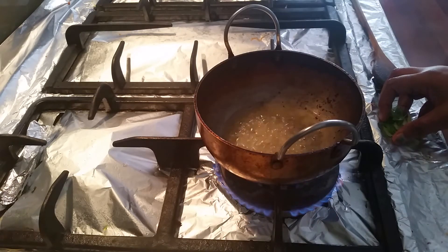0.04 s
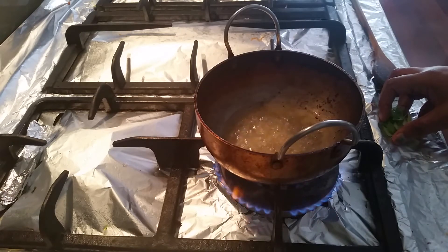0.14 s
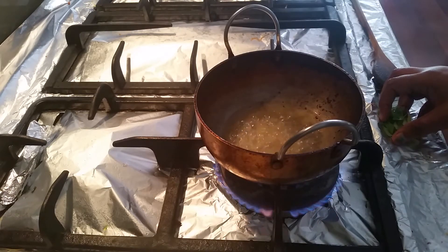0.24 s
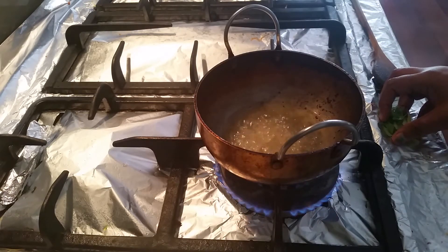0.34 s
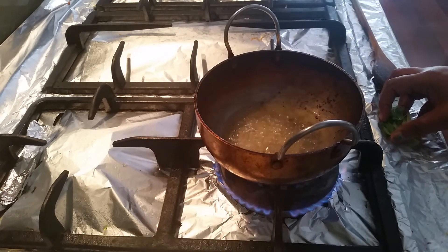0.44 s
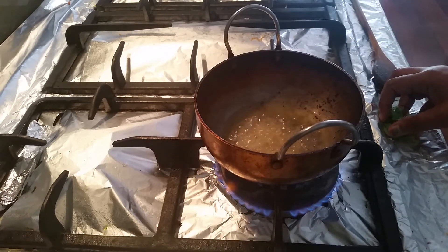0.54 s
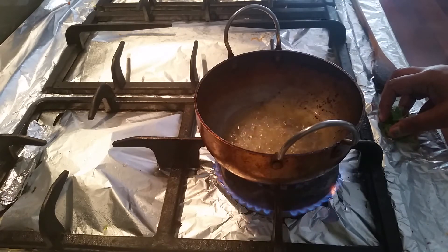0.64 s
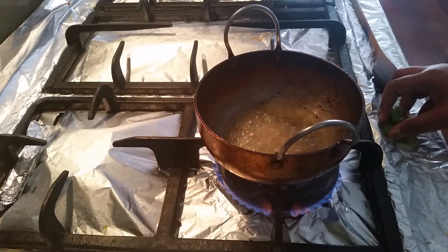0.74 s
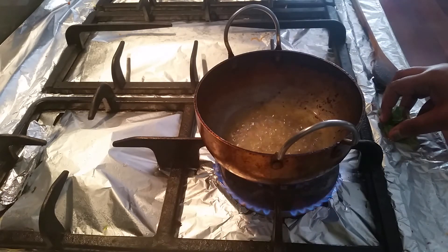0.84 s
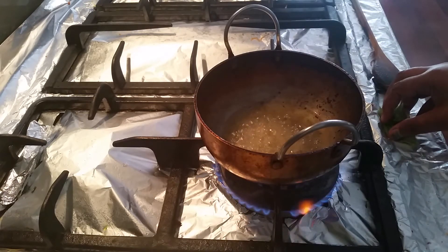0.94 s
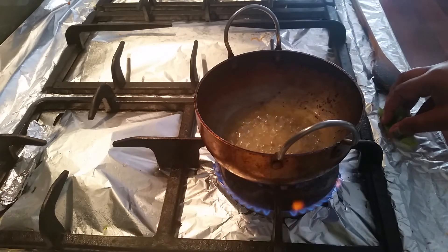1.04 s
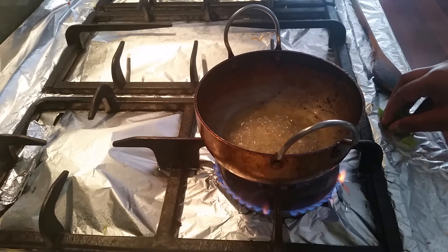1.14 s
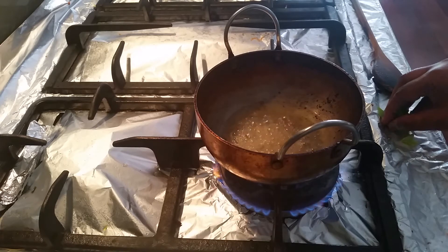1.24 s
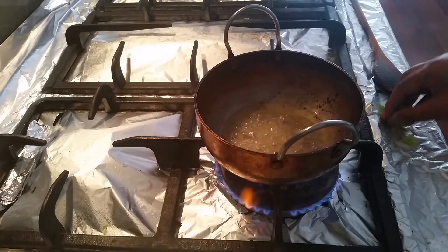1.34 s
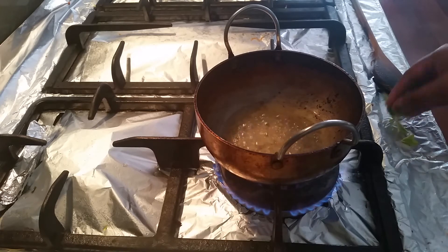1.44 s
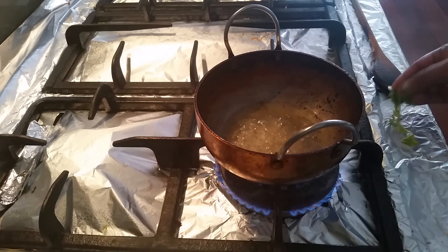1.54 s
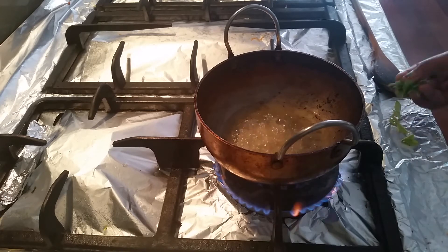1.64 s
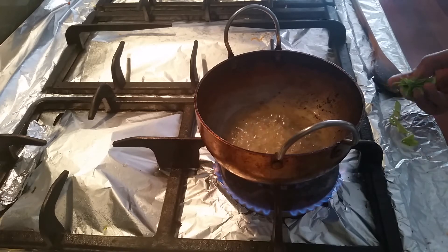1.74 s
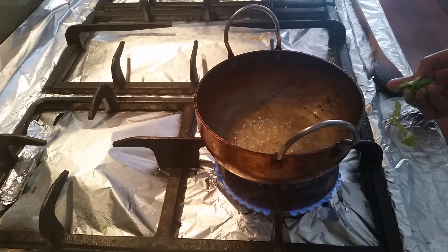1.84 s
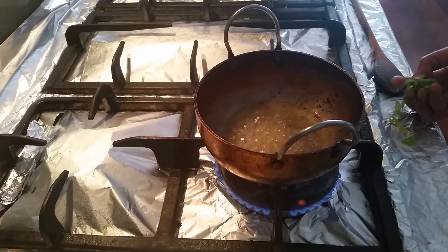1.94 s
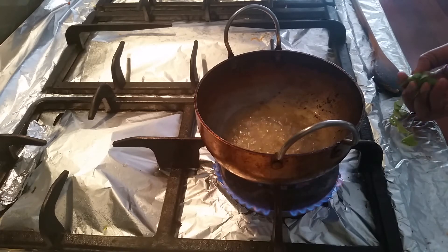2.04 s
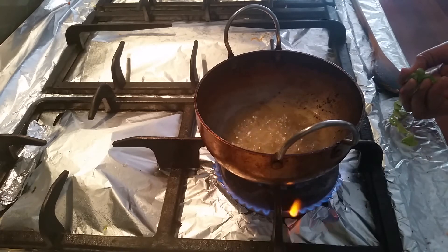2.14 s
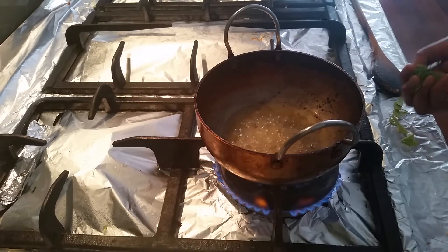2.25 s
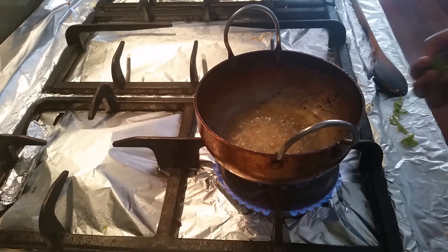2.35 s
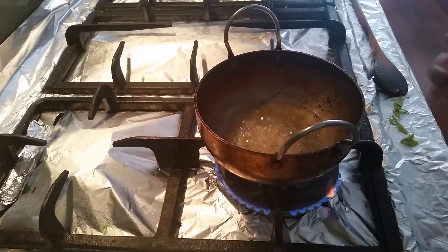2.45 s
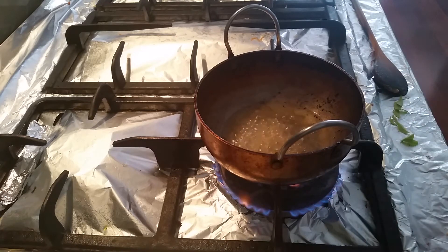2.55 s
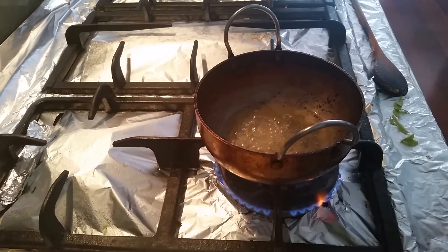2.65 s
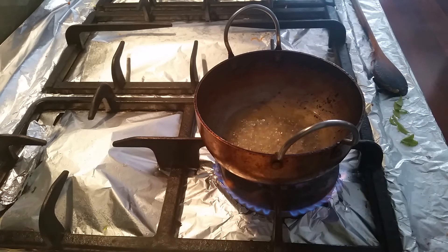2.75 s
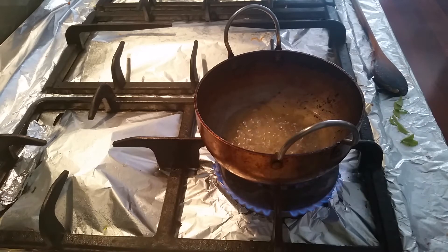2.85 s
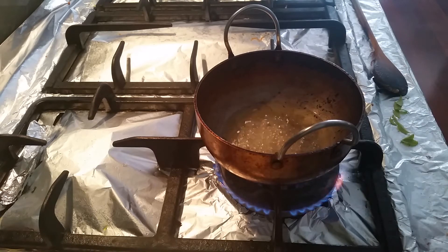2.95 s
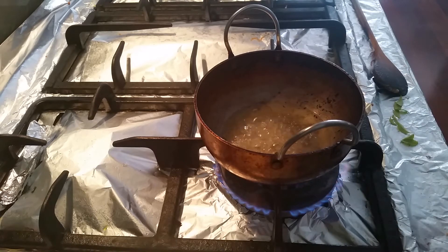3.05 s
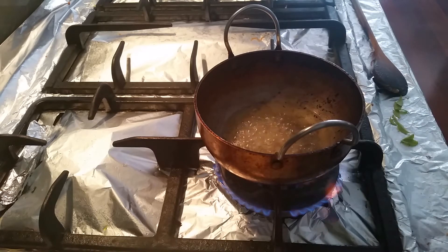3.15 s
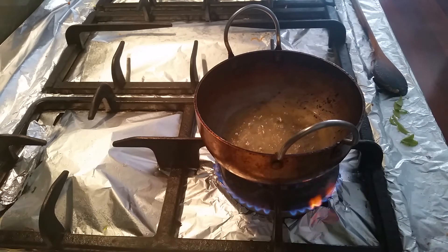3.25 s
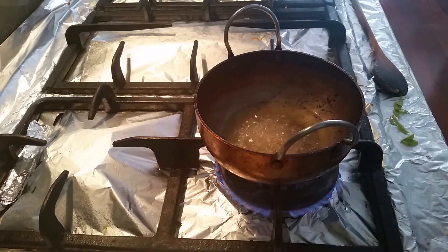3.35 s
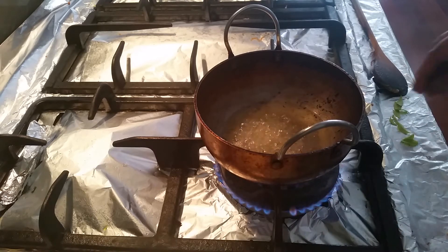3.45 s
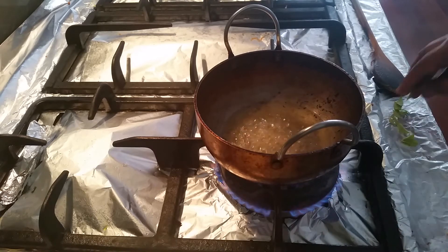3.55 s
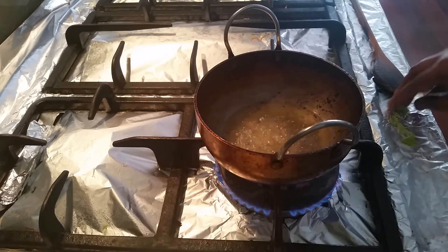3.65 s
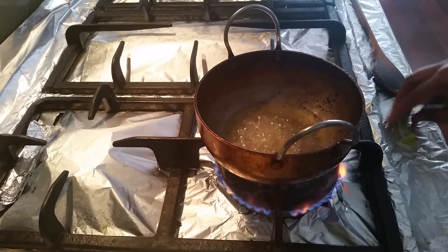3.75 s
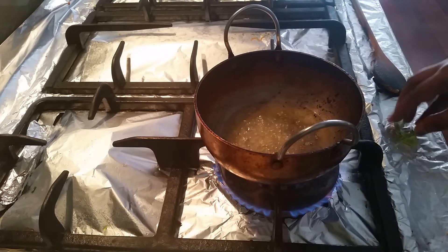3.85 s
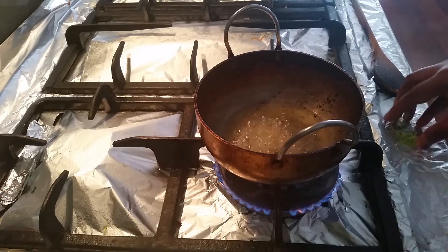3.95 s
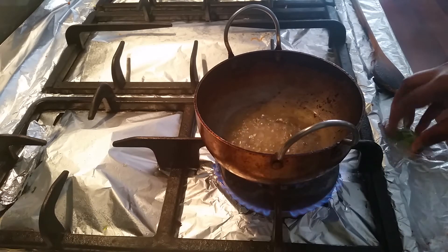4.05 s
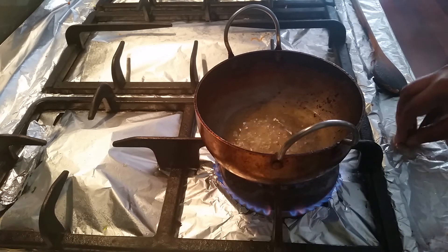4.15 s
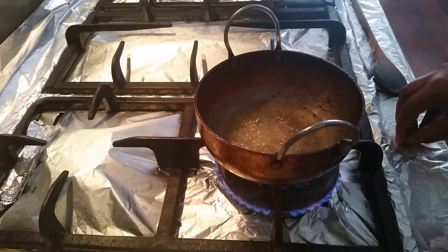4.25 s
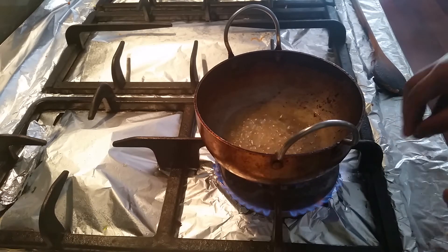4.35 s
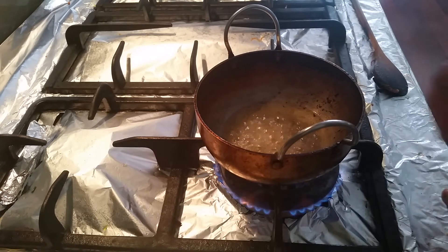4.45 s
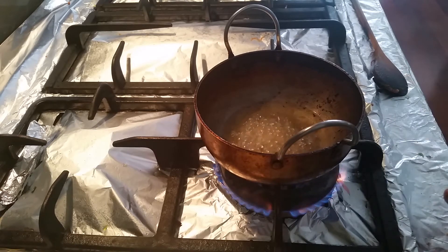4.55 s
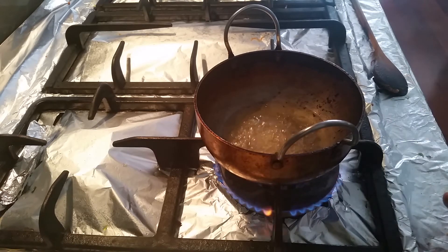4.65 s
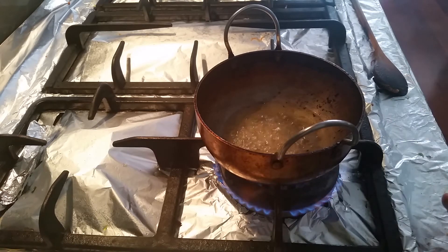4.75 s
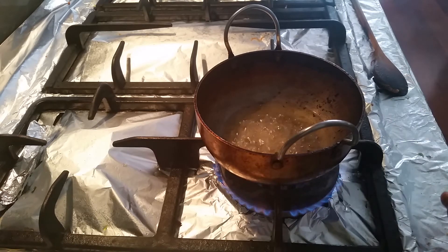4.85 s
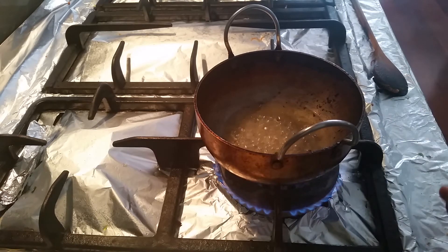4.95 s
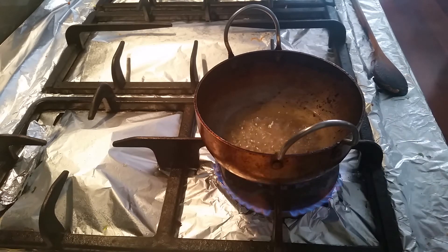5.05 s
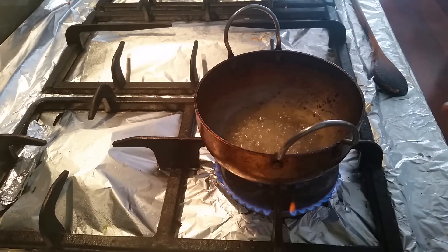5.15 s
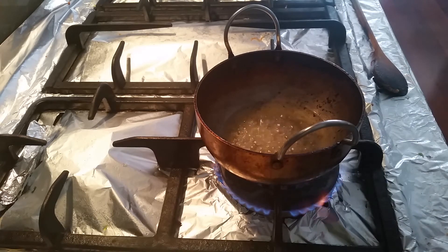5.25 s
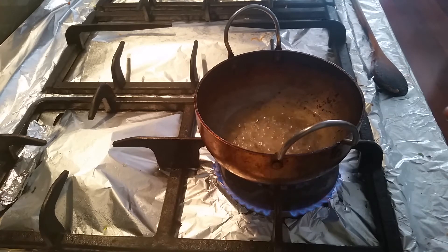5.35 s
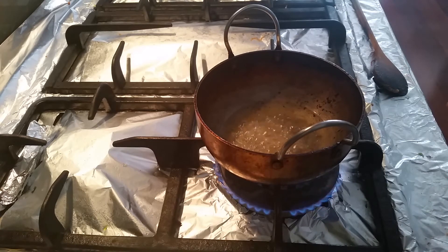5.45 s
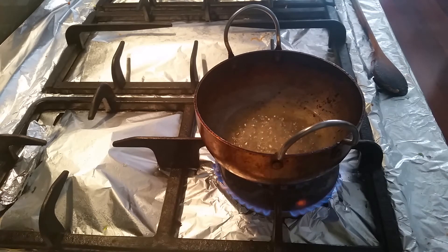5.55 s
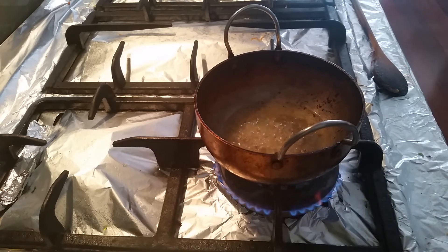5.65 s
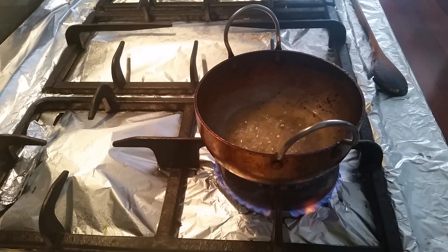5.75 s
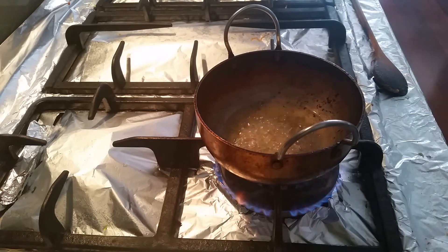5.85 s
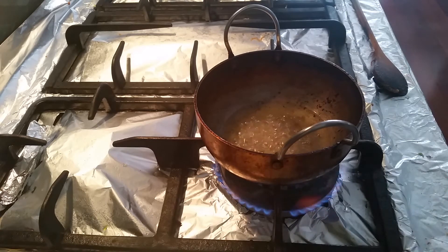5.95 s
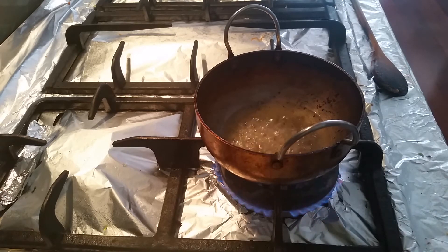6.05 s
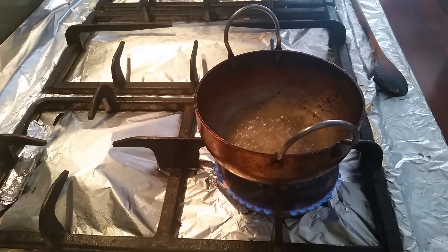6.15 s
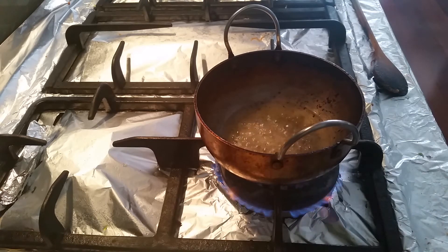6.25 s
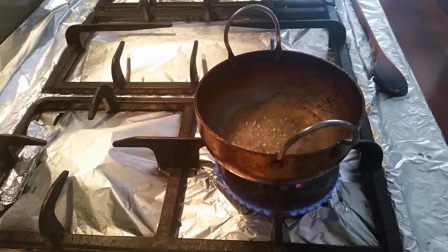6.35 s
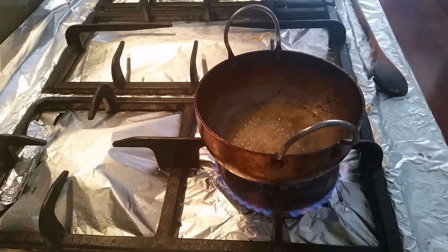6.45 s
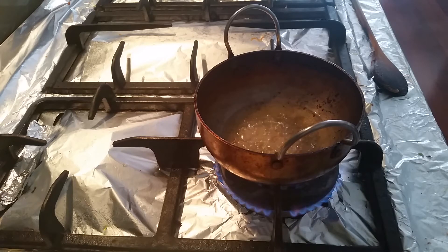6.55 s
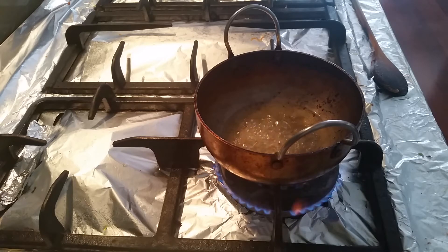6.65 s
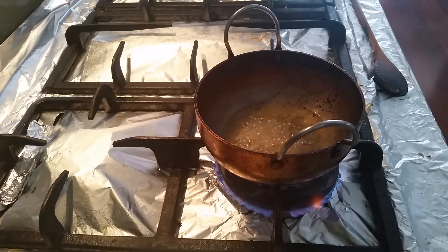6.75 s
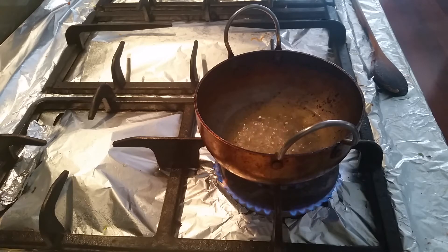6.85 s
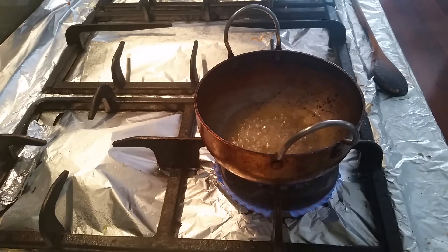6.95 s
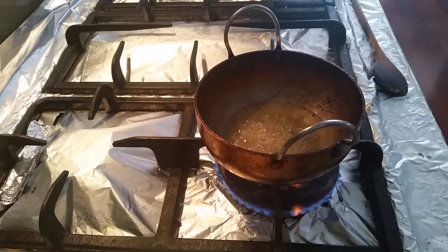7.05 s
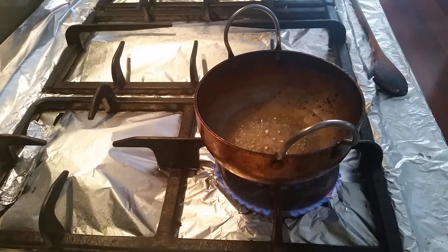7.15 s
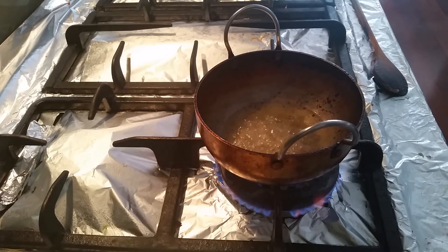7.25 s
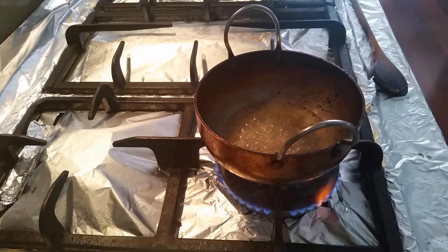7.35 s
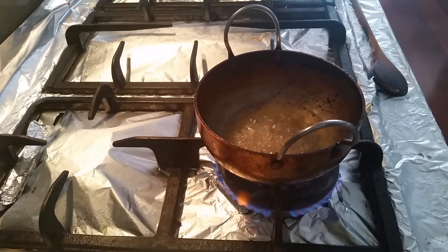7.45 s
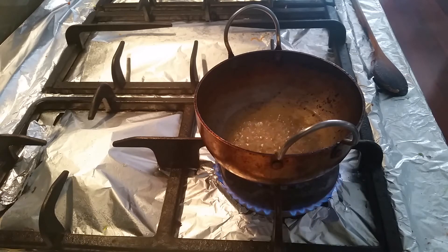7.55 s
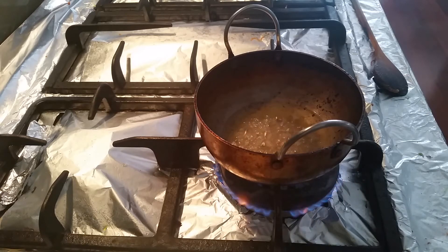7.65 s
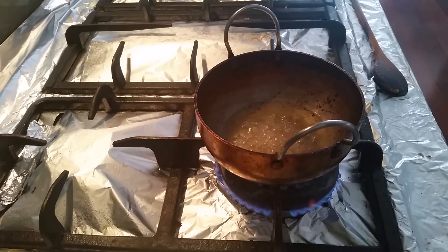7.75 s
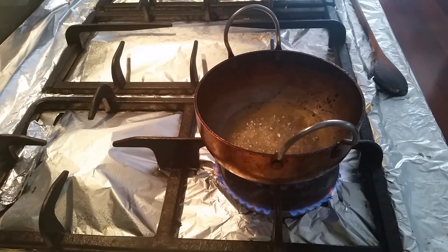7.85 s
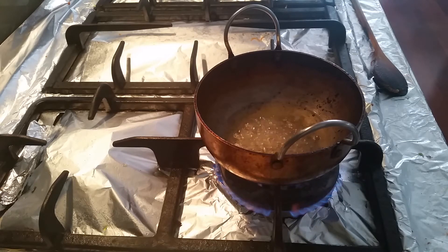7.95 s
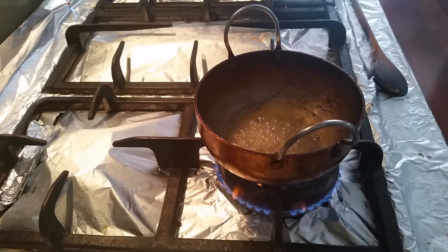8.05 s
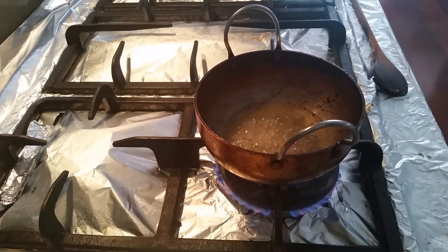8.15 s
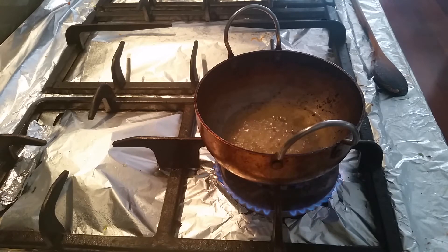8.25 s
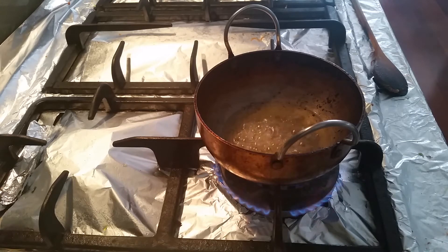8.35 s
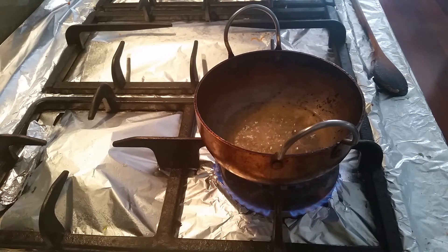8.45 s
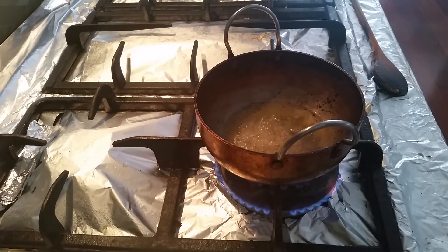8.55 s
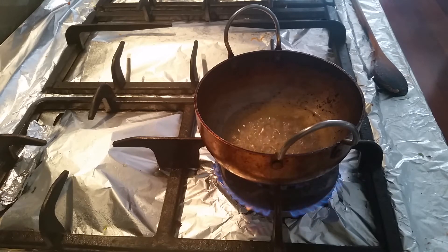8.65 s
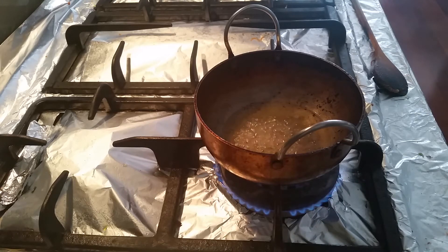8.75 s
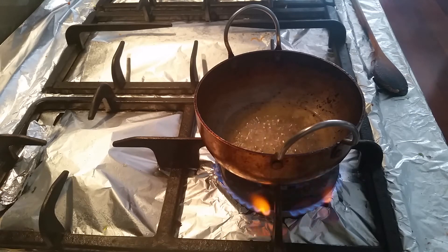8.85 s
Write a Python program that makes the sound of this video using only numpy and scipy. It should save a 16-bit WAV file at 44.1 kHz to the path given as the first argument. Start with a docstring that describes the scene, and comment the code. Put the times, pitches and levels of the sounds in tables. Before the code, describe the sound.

Hot oil fizzes and spits in a small pan over a fluttering gas flame while seeds pop and fingers rustle crinkly foil nearby.

```python
"""Seeds fry in hot oil in a small metal pan over a gas ring: the oil fizzes as noise with grains, spits and blips.
The flame roars as low noise and flutters with soft pulsed thuds about six times a second. Fingers gather leaves
off crinkled foil on the right (noise crackle, creases as bursts). Seeds pop as filtered bursts or ring the pan.
Once something hard knocks the stove, ringing resonances. The loudest pop is followed by a bright spray of oil;
the steady sounds dip right after that pop and sink again near 5.3 s."""
import sys
import numpy as np
from scipy import signal
from scipy.fft import rfft, irfft, next_fast_len
from scipy.io import wavfile
from scipy.ndimage import map_coordinates

SR = 44100
rng = np.random.default_rng(int(sys.argv[2]) if len(sys.argv) > 2 else 0)


def inscribe(sig):
    """Save sig as 16-bit PCM at rate SR to the path in sys.argv[1].

    A 1-D sig is mono; a 2-D sig holds one channel per row.
    Samples are clipped to [-1, 1] before scaling.
    """
    pcm = np.round(np.clip(np.atleast_2d(sig).T, -1, 1) * 32767)
    wavfile.write(sys.argv[1], SR, pcm.astype(np.int16))


N = 392049


def amp(db):
    """Gain of a level in dB."""
    return 10 ** (np.asarray(db) / 20)


def unit(x):
    """x at rms 1."""
    return x / np.sqrt(np.mean(x ** 2) + 1e-20)


def along(points, hz):
    """Interpolates (frequency, value) points on a log frequency axis."""
    point_hz, values = np.transpose(points)
    return np.interp(np.log(hz + 1), np.log(point_hz + 1), values)


def curves(rows):
    """One value per sample for each column after the time; -120 outside."""
    knot_s, *columns = np.transpose(rows)
    t = np.arange(N) / SR
    return [np.interp(t, knot_s, column, left=-120, right=-120) for column in columns]


def wobble(knots_per_s):
    """A smooth random curve through normally distributed knots."""
    knots = rng.standard_normal(int(N * knots_per_s / SR) + 4)
    return map_coordinates(knots, [np.arange(N) * knots_per_s / SR])


def filtered(x, response):
    """x times a response of frequency."""
    m = next_fast_len(N + SR // 2)
    return irfft(rfft(x, m) * response(np.fft.rfftfreq(m, 1 / SR)), m)[..., :N]


def band(hz, width_hz):
    """Response of a causal resonance."""
    return lambda f: 1j * f * width_hz / (hz * hz - f * f + 1j * f * width_hz)


def grains(per_s, spread_db, life_s):
    """A gain that jumps at random moments by widely spread amounts and decays with time constant life_s."""
    jump = amp(spread_db * np.minimum(rng.exponential(size=N), 3.5))
    jump = jump * (rng.random(N) < per_s / SR)
    return unit(signal.lfilter([1], [1, -np.exp(-1 / (life_s * SR))], jump))


# left-right likeness of noise: (frequency [Hz], correlation [-])
LIKENESS = [(60, 0.92), (180, 0.66), (550, 0.345), (1650, 0.16), (4970, 0.16), (15000, -0.15)]


def rush(spectrum, gain=1):
    """Stereo noise of rms 1, more alike in both ears toward the bass."""
    def turn(hz):
        return np.arccos(np.clip(along(LIKENESS, hz), -1, 1)) / 2

    def mid_side(hz):
        return amp(along(spectrum, hz)) * [np.cos(turn(hz)), np.sin(turn(hz))]

    mid, side = filtered(gain * rng.standard_normal((2, N)), mid_side)
    return unit(np.array([mid + side, mid - side]))


def burst(db, t60_s, click):
    """One sharp click, then noise that dies away, in both channels."""
    t = np.arange(SR // 10) / SR
    shared, own = rng.standard_normal(len(t)), rng.standard_normal((2, len(t)))
    shared[0] = click
    return amp(db - 60 * t / t60_s) * (shared + .5 * own)


def bursts(times_s, levels_db, t60_s, click):
    """Bursts laid out in time."""
    out = np.zeros((2, N + SR))
    for s, db in zip(times_s, levels_db):
        out[:, round(s * SR):][:, :SR // 10] += burst(db, t60_s, click)
    return out[:, :N]


# reverberation of the kitchen: (frequency [Hz], t60 [s])
KITCHEN_T60 = [(150, 0.23), (1150, 0.61), (2200, 0.71), (4000, 0.11), (12000, 0.21)]


def room(x, wet_db):
    """The kitchen answers with a noise tail; each frequency dies at its own speed."""
    hz, t, cells = signal.stft(rng.standard_normal((2, SR // 2)), SR, nperseg=256)
    decay = amp(-60 * t / along(KITCHEN_T60, hz)[:, None])
    tail = signal.istft(cells * decay, SR, nperseg=256)[1]
    tail = tail / np.linalg.norm(tail[0])
    return x + amp(wet_db) * signal.fftconvolve(x, tail, axes=1)[:, :N]


def late(pair, left=0, right=0):
    """Delays each channel by whole samples."""
    return np.array([np.roll(pair[0], left), np.roll(pair[1], right)])


def spits(per_s, low_hz, life_s):
    """Droplets and bubbles: decaying blips, pitched over 1.2 octaves, each from its own side; rms 1."""
    at, size, side, pitch, cycles = rng.random((int(per_s * N / SR), 5)).T[:, :, None]
    t, hz = np.arange(int(life_s * SR)) / SR, low_hz * 2 ** (1.2 * pitch)
    level_db = -4.5 * np.log(size + 0.068) - 60 * t * hz / (12 + 60 * cycles)  # -60 dB in 12-72 cycles
    blip = amp(level_db) * np.sin(2 * np.pi * hz * t) * np.sqrt(np.hanning(len(t)))
    where = ((at * N).astype(int) + np.arange(len(t))).ravel()
    channels = [np.bincount(where, (blip * g).ravel(), N + SR)[:N] for g in (side, 1 - side)]
    return unit(np.array(channels))


# steady sounds: (time [s], fizz level [dB])
STEADY_LEVEL = [(0.0, -48.5), (0.52, -49.5), (1.5, -49.5), (2.67, -53.5), (3.7, -52), (3.91, -49.5),
                (4.26, -47), (4.68, -50.5), (4.695, -62), (4.708, -60), (4.714, -55.5), (4.83, -53.5),
                (5.05, -60.5), (5.35, -64), (5.62, -61.5), (5.97, -54), (7.1, -52), (7.4, -51.5),
                (7.92, -52.5), (8.59, -53), (8.89, -49)]
# fizz spectrum: (frequency [Hz], relative density [dB per Hz])
FIZZ_SPECTRUM = [(350, -19.5), (600, -9.5), (868, -7.5), (1160, 0.5), (1380, -9.5), (1890, -15),
                 (2450, -7.5), (2730, -11), (3130, -2), (3790, 2.5), (5640, -7), (6600, -8.5), (7800, -8),
                 (8970, -14), (10400, -9), (15700, -19.5)]
# single bubbles and spits, short pitched blips, some very high:
# (time [s], level [dB], start pitch [Hz], length [s])
SINGLE_BLIPS = [(.04, -42.5, 3103, 0.0089), (0.054, -42, 3766, 0.0096), (0.078, -47.5, 3230, 0.0143),
                (0.09, -46, 3800, 0.028), (0.112, -47.5, 3360, 0.028), (0.14, -47, 3794, 0.026),
                (0.153, -45, 4270, 0.028), (3.237, -45, 3780, 0.021), (6.555, -56, 14760, .03),
                (7.752, -49, 13200, 0.0059), (8.001, -53, 11600, 0.014), (8.395, -53.5, 13300, 0.016)]


def oil():
    """Countless steam bubbles hiss, with spits, small bubbles and a low gurgle; single blips glide upward."""
    fizz_db = curves(STEADY_LEVEL)[0] + 0.86 * wobble(3.324) + 1.28 * wobble(15)
    fizz = rush(FIZZ_SPECTRUM, 2.0 + 0.34 * grains(200, spread_db=1.5, life_s=0.0043))
    blips = np.zeros(N)
    for s, db, hz, length_s in SINGLE_BLIPS:
        t = np.arange(round(length_s * SR)) / SR
        # random phase drift blurs the tone
        drift = np.cumsum(rng.normal(0, 0.00352 * np.sqrt(hz / 100), len(t)))
        cycles = hz * t * (1 + 0.02 * t / length_s) + drift
        blips[round(s * SR):][:len(t)] += amp(db) * np.hanning(len(t)) * np.sin(2 * np.pi * cycles)
    fizz += amp(-19) * spits(per_s=59, low_hz=6500, life_s=.01)
    fizz += amp(-17) * spits(per_s=220, low_hz=3200, life_s=.02)
    fizz += amp(-19.5) * spits(per_s=90, low_hz=298.4, life_s=0.026)  # gurgle
    return amp(fizz_db) * fizz + room(blips[None], wet_db=3.5)


# roar spectrum: (frequency [Hz], relative density [dB per Hz])
ROAR_SPECTRUM = [(15, -30.5), (25, -21.5), (43, 0), (96, 0.5), (172, 0.5), (223, -4.5), (692, -20.5),
                 (800, -21.5), (1040, -48.5), (1760, -120)]
# flame thuds: (time [s], level [dB])
FLAME_THUDS = [(0.11, -39), (0.282, -31.5), (0.448, -45.5), (0.613, -41), (0.782, -40), (0.955, -39.5),
               (1.148, -42), (1.292, -41), (1.642, -40), (1.808, -45), (1.959, -45), (2.142, -42),
               (2.304, -41.5), (2.443, -40), (2.575, -42.5), (2.754, -44), (2.926, -41.5), (3.081, -44.5),
               (3.255, -32.5), (3.418, -42.5), (3.602, -42.5), (3.777, -40), (3.951, -51.5), (4.105, -39.5),
               (4.285, -39.5), (4.443, -42), (4.623, -41), (4.793, -39), (4.94, -44), (5.305, -54),
               (5.452, -53), (5.632, -49), (5.799, -39.5), (5.966, -41.5), (6.151, -44), (6.328, -41.5),
               (6.495, -42.5), (6.675, -40.5), (6.835, -41), (7.009, -37.5), (7.178, -40), (7.349, -39),
               (7.526, -42.5), (7.727, -38.5), (7.867, -37), (8.038, -41), (8.217, -40.5), (8.383, -35),
               (8.563, -42.5), (8.689, -46), (8.737, -39)]
ROAR_DB, ROAR_SWING_DB_PER_DB = -60.5, 0.78  # mean level; swing per dB of fizz
PULSE_GAP_S, GAP_SCATTER = 0.00822, 0.22  # median; log-normal sigma
LEAD_DB, TRAIL_DB = -7.5, -6
LONE_DB_PER_DB = 1  # first pulse's loss per dB of thud above average
SHARP_DB, SHARP_GROWS_DB_PER_DB = -13, 0.5  # edge of a thud; extra per dB of thud above average


def flame():
    """Low roar; a flutter is four soft suction pulses, the second usually strongest, sharper when loud."""
    level_db, = curves(STEADY_LEVEL)
    roar_db = ROAR_DB + ROAR_SWING_DB_PER_DB * (level_db - level_db.mean()) + 2 * wobble(13)
    s, db = np.transpose(FLAME_THUDS)
    draw = rng.standard_normal((len(s), 5))
    gap_s = PULSE_GAP_S * np.exp(GAP_SCATTER * draw[:, 4])
    relative_db = db - db.mean()
    over_db = np.maximum(relative_db, 0)
    pulses, edges = np.zeros((2, N + SR))
    for k, step_db in enumerate((LEAD_DB, 0, TRAIL_DB, 2 * TRAIL_DB)):
        pulse_db = db + step_db
        if k != 1:
            pulse_db = pulse_db + 2.5 * draw[:, k]
        if k == 0:
            pulse_db = pulse_db - LONE_DB_PER_DB * over_db
        pulses[np.round((s + .01 + (k - 1) * gap_s) * SR).astype(int)] -= amp(pulse_db)
    edge_db = db + SHARP_DB + SHARP_GROWS_DB_PER_DB * relative_db + 3.8 * draw[:, 1]
    edges[np.round((s + .01) * SR).astype(int)] -= amp(edge_db)

    def body(f):
        return (band(115, 85)(f) + 0.14 * band(270, 250)(f)) / (1 + 1j * f / 480) ** 2

    def edge(f):
        return band(520, 600)(f) ** 2 / (1 + 1j * f / 900) ** 2

    def shaped(x, colour):  # unit impulse -> unit peak
        return filtered(x[:N], colour) / np.abs(filtered(np.arange(N) == 0, colour)).max()

    thuds = (shaped(pulses, body) + shaped(edges, edge)) * amp([[.5], [-.5]])
    return amp(roar_db) * rush(ROAR_SPECTRUM) + room(thuds, wet_db=-11.5)


# fingers on foil, one curve per stroke: (time [s], level [dB])
RUSTLE_STROKES = [
    [(0.0, -47), (0.136, -57.5), (0.43, -53.5), (0.57, -48.5), (0.8, -51), (0.87, -44), (0.97, -51.5),
     (1.082, -42.5), (1.15, -39.5), (1.218, -47), (1.3, -47), (1.408, -41.5), (1.49, -55), (1.75, -57)],
    [(3.686, -78), (3.694, -45), (3.714, -42), (3.726, -52), (3.744, -43), (3.756, -44), (3.8, -36.5),
     (3.838, -28.5), (3.885, -40.5), (3.93, -56), (3.986, -54)],
    [(3.99, -52), (3.998, -37), (4.022, -45), (4.032, -45.5), (4.056, -49), (4.064, -33.5), (4.09, -38.5),
     (4.14, -34.5), (4.24, -36), (4.264, -45), (4.28, -54.5), (4.29, -31), (4.31, -51), (4.344, -45.5),
     (4.354, -51), (4.36, -46), (4.378, -38.5), (4.396, -59), (4.45, -66)],
]
# loudest creases: (time [s], level before SNAP_DB and colour [dB])
CREASES = [(0.323, -29.5), (0.4474, -33), (0.4818, -26), (0.4941, -23.5), (0.5287, -31.5), (0.5702, -26),
           (0.647, -25), (0.694, -27), (0.711, -32.5), (0.7648, -27.5), (0.801, -30), (0.812, -27.5),
           (0.832, -28), (0.8467, -23), (0.8685, -28), (0.9568, -29), (0.9782, -20.5), (1.0235, -29),
           (1.058, -25), (1.0624, -31.5), (1.0735, -23), (1.0784, -26.5), (1.099, -23), (1.111, -34.5),
           (1.1308, -28), (1.141, -23), (1.146, -24.5), (1.1496, -23), (1.178, -31), (1.1958, -28),
           (1.254, -29.5), (1.2587, -23), (1.28, -34), (1.3123, -31.5), (1.3166, -26), (1.3478, -21.5),
           (1.354, -31), (1.3877, -29.5), (1.398, -26), (1.403, -35), (1.419, -31.5), (1.6005, -34),
           (3.6945, -31.5), (3.711, -28), (3.7409, -31), (3.7757, -36), (3.813, -28), (3.997, -27),
           (4.017, -25.5), (4.0622, -31), (4.0826, -24), (4.1031, -27.5), (4.136, -23), (4.187, -21.5),
           (4.209, -21.5), (4.224, -20), (4.239, -21), (4.2867, -20.5), (4.3321, -34), (4.341, -30.5),
           (4.359, -21), (4.3707, -21), (4.4927, -32.5)]
# foil colour: (frequency [Hz], relative density [dB per Hz])
FOIL_COLOUR = [(1470, -32), (2500, -22.5), (2740, -28.5), (3120, -15.5), (4000, -22), (4960, -13),
               (5480, -12.5), (8690, -11.5), (10100, -3.5), (15700, -8)]
SNAP_DB, SNAP_T60_S, CREST_S = 4, .014, .0007  # crack: gain, decay, delay
AFTER_DB, AFTER_T60_S = -14, .035  # sheet rattle after the crack


def foil():
    """Creases snap, then rattle the sheet, over dense tiny crackle and smaller creases, close on the right."""
    def colour(hz):
        return amp(along(FOIL_COLOUR, hz))

    grain = 0.55 + 0.45 * grains(600, spread_db=1.5, life_s=0.0008)
    grain += 0.45 * grains(90, spread_db=2.5, life_s=.003)
    crackle = unit(filtered(rng.standard_normal((2, N)) * grain, colour))
    stroke = sum(amp(curves(rows)[0]) for rows in RUSTLE_STROKES)
    s, db = np.transpose(CREASES)

    def creases(level_db):
        cracks = bursts(s + CREST_S, level_db, SNAP_T60_S, click=2.2)
        return cracks + bursts(s + CREST_S, level_db + AFTER_DB, AFTER_T60_S, click=0)

    deep_db = rng.normal(-1.72, 1.64, len(s))  # each crease reaches down by its own amount
    snaps = filtered(creases(db + SNAP_DB), lambda hz: colour(hz) * (hz > 8700))
    snaps += filtered(creases(db + SNAP_DB + deep_db), lambda hz: colour(hz) * (hz <= 8700))
    near = late(stroke * crackle + snaps, right=1) * amp([[-4], [4]])
    return room(near, wet_db=-6.5)


# popping seeds, parts relative to the main level:
# (time [s], main level [dB], pitch [Hz], low part [dB], high part [dB])
SEED_POPS = [(0.4423, -32.5, 2900, -8, -1), (1.8378, -25, 3430, -9, -18), (1.956, -43, 3200, 0.5, -11.5),
             (2.1723, -45, 4050, -1, -19), (3.1358, -34.5, 3180, 5, -25), (3.427, -37, 4110, -32, -16),
             (4.1242, -32.5, 5680, -4.5, -3), (4.625, -38.5, 3600, -17, 1), (4.6762, -23, 5760, -36, -10),
             (4.711, -33, 4450, -13, 5), (4.7162, -38, 4300, -13.5, -2), (4.9836, -32.5, 4640, -16.5, -5.5),
             (5.7172, -38.5, 3370, -6.5, -27), (6.577, -39, 3510, -12.5, -23),
             (6.726, -43.5, 4100, -2.5, -18.5), (6.872, -40.5, 4980, 3.5, -27),
             (7.5978, -40, 3900, -5, -20), (7.66, -40.5, 3850, -6, -19), (7.67, -41.5, 2200, -2.5, -17),
             (8.023, -41.5, 2300, -0.5, -16), (8.69, -43, 3700, -6, -8), (8.7625, -24, 3200, -10, -0.5)]
# seeds flung against the pan: (time [s], level [dB], place [0 wall .. 1 rim])
PAN_CLINKS = [(1.838, -49, 0.66), (7.038, -44.5, 0), (7.164, -50, 0), (7.5427, -46, 0.93),
              (7.5482, -51, 0.84), (7.5875, -55.5, 1), (7.646, -51, 0.92)]
# pan modes: (frequency [Hz], level at wall [dB], level at rim [dB], t60 [s])
PAN_MODES = [(2170, -12.5, -14, 0.36), (3038, -10, -6.5, 0.16), (3900, -17.5, 3.5, 0.096),
             (4060, 4, -10, 0.13), (4370, -1, -15, 0.06), (4950, -6, 2.5, 0.058)]
POP_T60_S, POP_LOW_T60_S = 0.05, 0.14


def seeds():
    """A bursting seed is a short crack in three resonant parts; a flung one rings the pan's modes."""
    out, t = np.zeros((2, N + SR)), np.arange(SR // 4) / SR
    for s, db, hz, low_db, high_db in SEED_POPS:
        parts = ((db, hz, 3.2, 14, POP_T60_S),
                 (db + low_db, 1200, 3.2, 40, POP_LOW_T60_S),
                 (db + high_db, 9500, 1.5, 7, POP_T60_S))
        for level_db, centre_hz, q, click, t60_s in parts:
            ring = signal.iirpeak(centre_hz, q, SR)
            crack = burst(0, t60_s, click)
            crack = signal.lfilter(*ring, signal.lfilter(*ring, crack))
            out[:, round(s * SR):][:, :SR // 10] += amp(level_db) * crack / np.abs(crack).max()
    for s, db, where in PAN_CLINKS:
        for hz, wall_db, rim_db, t60_s in PAN_MODES:
            drift = np.cumsum(rng.normal(0, 0.014, len(t)))  # sloshing oil roughens the ring
            mode_db = db + wall_db + where * (rim_db - wall_db) + rng.normal(0, 2.36)
            envelope = amp(mode_db - 60 * t / t60_s) * (1 - np.exp(-t / 0.00076))
            out[:, round(s * SR):][:, :len(t)] += envelope * np.sin(2 * np.pi * (hz * t + drift))
    return room(out[:, :N] * amp([[-.7], [.7]]), wet_db=-12.0)


# blow and bounces: (time [s], drive of bright modes [dB], drive of dull modes [dB])
BLOWS = [(1.4673, 6, -28), (1.4718, 5, -31.5), (1.476, -2, -10), (1.4871, 3.5, -16), (1.4925, -1.5, -10.5),
         (1.4985, -5.5, -0.5), (1.5035, -18.5, -22)]
# bright iron modes: (frequency [Hz], width [Hz], level [dB])
BRIGHT_MODES = [(1070, 24, -6), (1138, 57, -3), (1298, 40, -10.5), (1367, 39, -6.5), (1510, 28, -13),
                (2011, 87, -15.5), (2200, 56, -11), (2424, 70, -23), (2550, 54, -19), (2900, 82, -23),
                (3430, 370, -28.5), (4006, 50, -15.5), (4715, 110, -22.5)]
# dull body modes: (frequency [Hz], width [Hz], level [dB])
DULL_MODES = [(120, 26, 0), (235, 13, 1.5), (513, 24, 1), (732.5, 35, -14)]
DULLS_DB_PER_S = 170  # later bounces stir the highest modes less
CRACK_DB, THUMP_DB = -25, -8  # noise crack; broad edge of a blow
RATTLE_DB, RATTLE_T60_S = -39.5, 0.49  # loose iron that shivers on


def knock():
    """The blow rings bright iron first; the bounces bring the dull body under it; loose iron shivers on."""
    s, bright_db, dull_db = np.transpose(BLOWS)

    def modes(table):  # resonances of alternating sign
        return lambda f: sum((-1) ** k * amp(db) * band(hz, w)(f) for k, (hz, w, db) in enumerate(table))

    def blows(db):
        return bursts(s, db, t60_s=.004, click=12)

    sharp_db = bright_db - DULLS_DB_PER_S * (s - s[0])
    grate = filtered(blows(bright_db), modes(BRIGHT_MODES[:5]))
    clatter = filtered(blows(sharp_db), modes(BRIGHT_MODES[5:]))
    dull = filtered(blows(dull_db), modes(DULL_MODES))
    crack = filtered(bursts(s, sharp_db + CRACK_DB, t60_s=0.033, click=2.2), band(2200, 3000))
    grate += amp(THUMP_DB) * filtered(blows(bright_db), lambda f: band(1250, 900)(f) ** 2)
    since_s = np.arange(N) / SR - s[0]
    shiver_db = RATTLE_DB - 60 * np.abs(since_s) / RATTLE_T60_S + 1.6 * wobble(60)
    shiver = amp(shiver_db) * (since_s > 0) * rush([(200, -6.5), (600, 2), (2400, -5), (5000, -18.5)])
    return shiver + room(late(grate + dull, left=8) + late(clatter + crack, left=2), wet_db=-17.5)


# oil spray: (time [s], level [dB])
SPATTER_LEVEL = [(4.709, -66), (4.713, -21), (4.722, -32.5), (4.752, -40), (4.85, -51), (5.0, -72)]
# spray spectrum: (frequency [Hz], relative density [dB per Hz])
SPRAY_SPECTRUM = [(1500, -23.5), (3000, -11.5), (6000, -8.5), (8500, -6), (10500, 0.5), (15700, -5)]


def spatter():
    """A fine bright spray of oil, grainy noise, rains down after the loudest pop."""
    grain = 1 + .4 * grains(400, spread_db=6, life_s=0.0013)
    return amp(curves(SPATTER_LEVEL)[0]) * rush(SPRAY_SPECTRUM, grain)


def scene():
    """Everything in the kitchen."""
    return oil() + flame() + foil() + seeds() + knock() + spatter()


def record(dry):
    """Band limit: fades out over the 300 Hz below 16 kHz, nothing above."""
    return filtered(dry, lambda hz: np.clip((16000 - hz) / 300, 0, 1))


dry = scene()
out = record(dry)
inscribe(out)
```